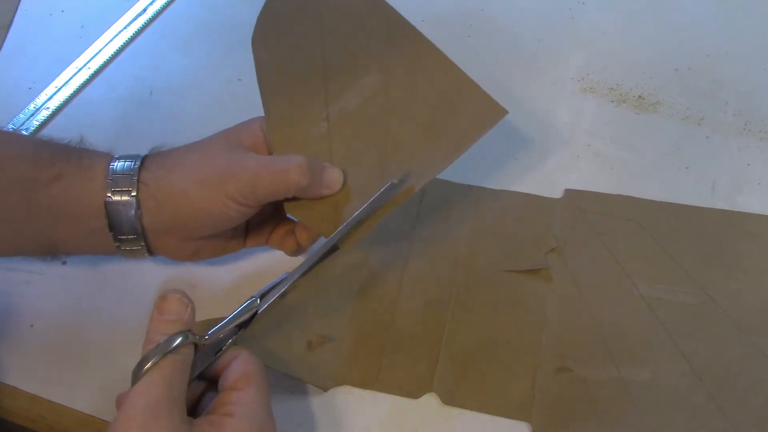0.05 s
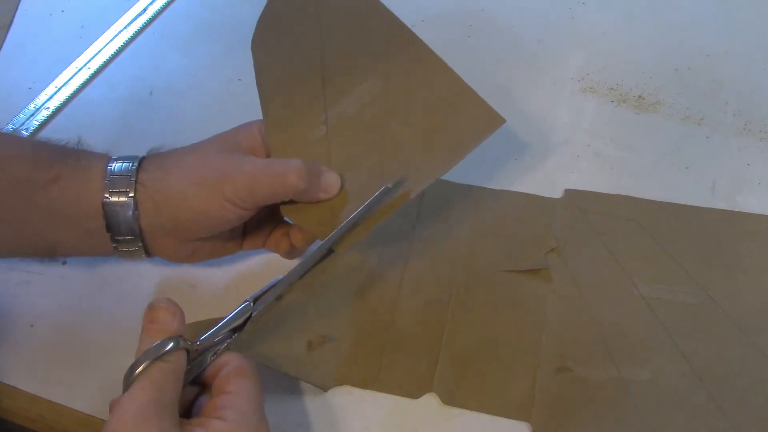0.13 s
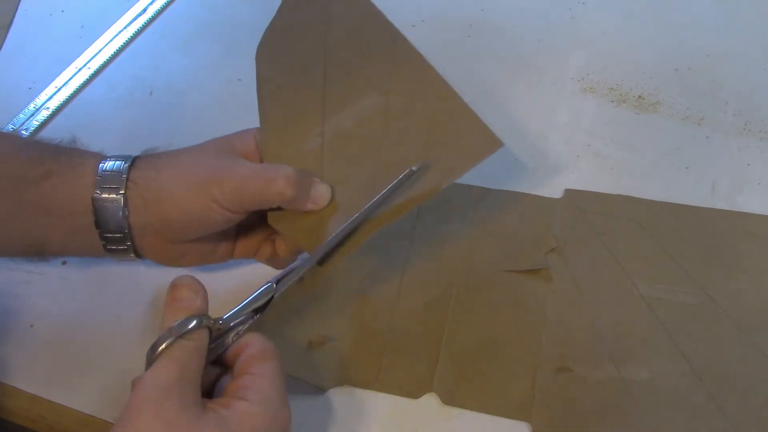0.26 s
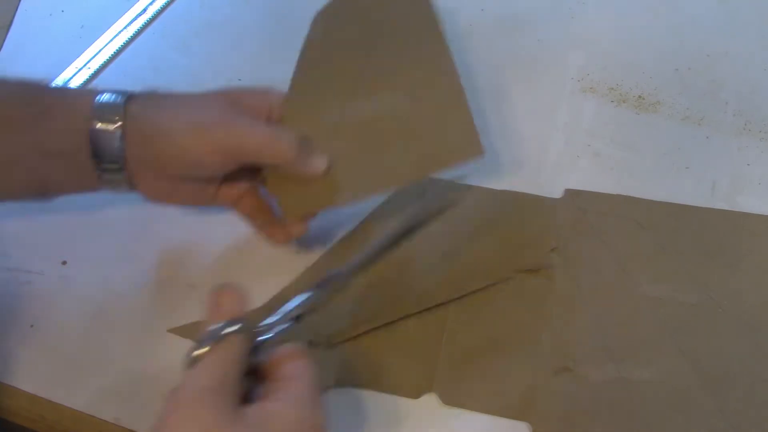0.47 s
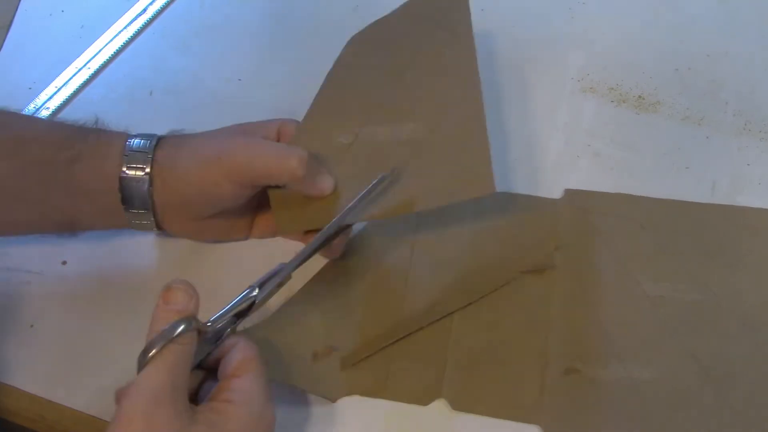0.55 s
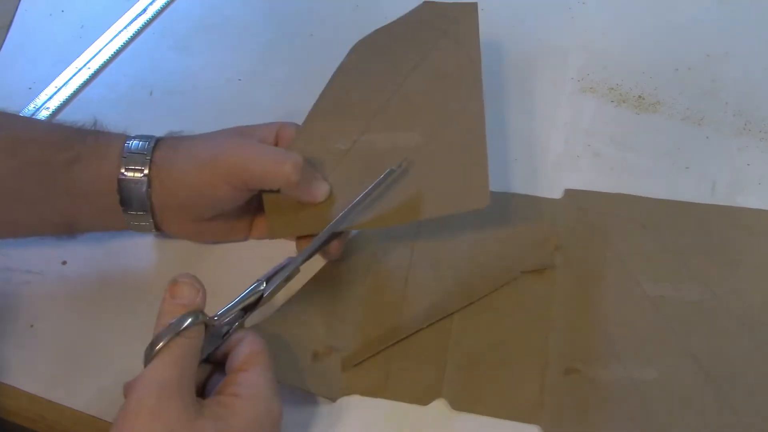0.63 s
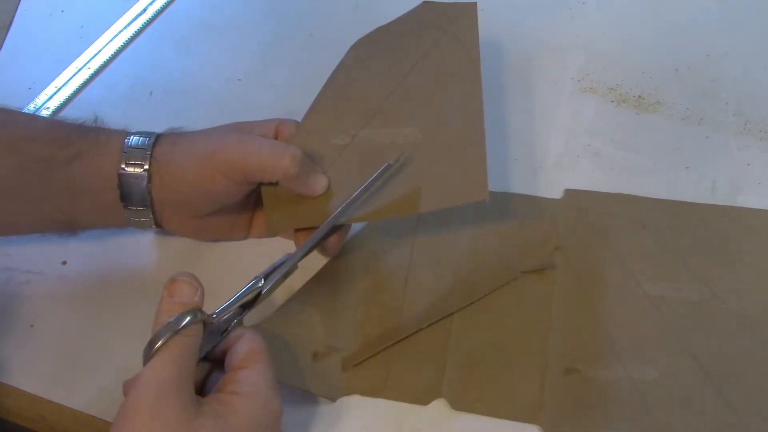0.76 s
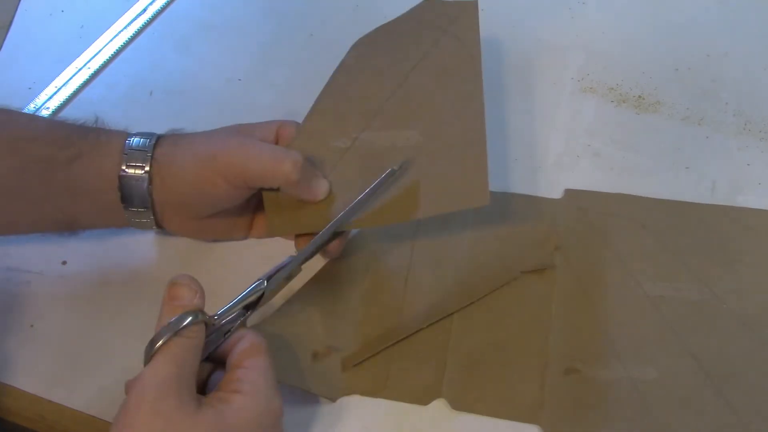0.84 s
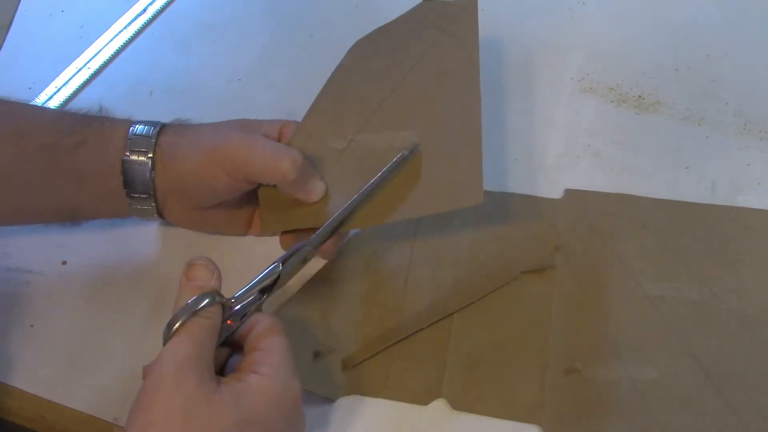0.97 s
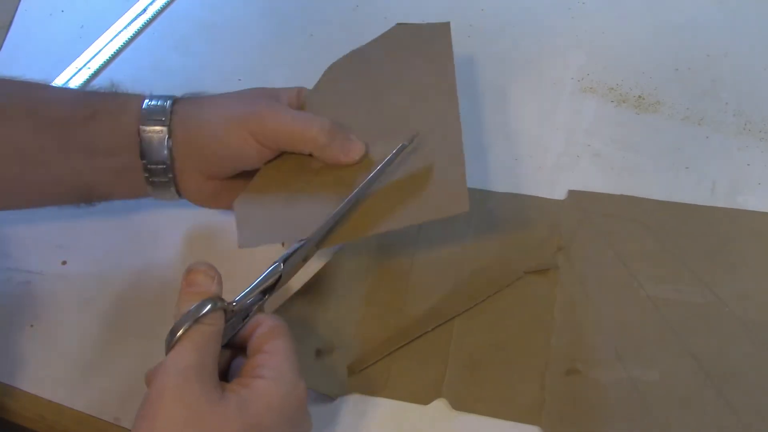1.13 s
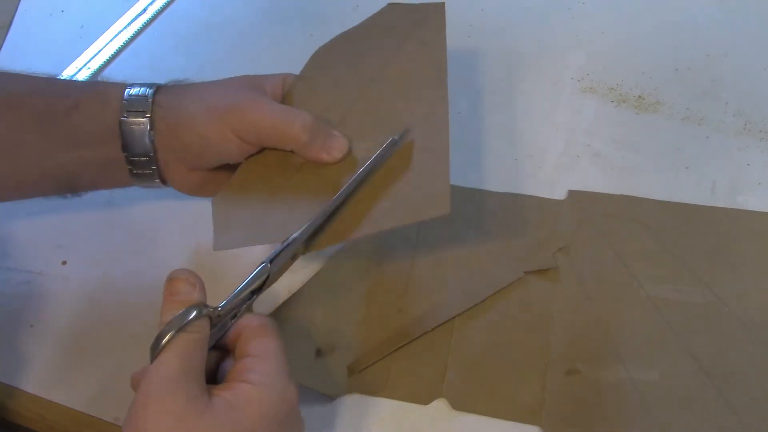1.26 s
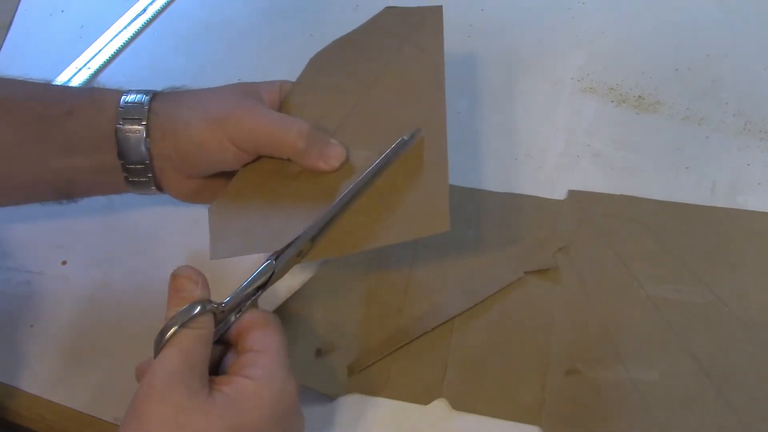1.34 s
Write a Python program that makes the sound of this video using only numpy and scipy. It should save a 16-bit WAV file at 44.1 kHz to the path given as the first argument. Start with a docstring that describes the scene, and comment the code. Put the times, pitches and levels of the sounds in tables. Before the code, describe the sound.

Scissors cut thin cardboard: crisp crunches, one loud metallic snap, a pause, then gentler snips

```python
"""Scissors through thin cardboard

Close on steel scissors cutting thin cardboard over a table in a quiet room. Crunches are bursts of breaking fibres
that crackle and shake the sheet; many make the blades ring faintly, others are without blade ring.
Some breaks add a short ping. The first cut ends in one loud snap as the blades close through the edge; after a
pause a second, gentler cut begins. Table and hands reflect at short distance, over steady rumble and hiss."""
import sys
import numpy as np
from scipy import signal
from scipy.fft import rfft, irfft
from scipy.io import wavfile
from scipy.ndimage import uniform_filter1d

SR = 44100
rng = np.random.default_rng(int(sys.argv[2]) if len(sys.argv) > 2 else 0)


def wav_out(sig):
    """Save sig, one row per channel (or a flat mono array), as 16-bit PCM at SR to the path in sys.argv[1]."""
    wavfile.write(sys.argv[1], SR, np.round(np.clip(np.atleast_2d(sig).T, -1, 1) * 32767).astype(np.int16))


N = 61739

# steady background of the room, its colour: pitch_hz, level_db
BACKGROUND_COLOUR = [(20, -4), (80, 0.5), (150, -5.5), (400, -7), (1100, -12.5), (3500, -17.5),
                     (10000, -23.5), (15500, -29.5)]
BACKGROUND_DB = -58.5

# bursts of breaking fibres: mean rate, and decibels multiplying a random size of mean 1
FIBRES_PER_S, FIBRE_SCATTER_DB = 9000, 1.57
# the edge catches and slips: decibels per standard deviation, and averaging length of the clumps
CATCH_DB, CATCH_S = 1.95, .001

# colour of tearing fibres: pitch_hz, level_db
TEAR_COLOUR = [(300, -35), (900, -8), (1800, 6), (2900, 4), (5600, 3), (6600, -5), (10000, -5),
               (16000, -28)]
# nominal hump width as a share of its centre, and share of plain tearing under it; damping scales both
CRACKLE_WIDTH, CRACKLE_BASE = 0.34, 0.47

# modes of the held sheet: pitch_ratio (of its resonance), width_ratio (of its resonance, at damping 1), level_db
SHEET_MODES = [(.45, 0.21, -8), (1.0, 0.43, 10), (1.36, 0.21, 0.5), (1.8, 1, -4), (.74, 0.41, 1.5)]
SHEET_LEAD_S = 0.001914  # head start at damping 1, so that the slowly swelling modes crest with the crackle

# crunches of breaking fibres without blade ring: middle_s, spread_s, sheet_db, crackle_hz (hump centre), crackle_db
RINGLESS_CRUNCHES = [ (.005, .0045, -60, 2800, -55.5), (.06, .011, -52, 3360, -50),
                     (.115, 0.012, -53.5, 2580, -60), (0.14, 0.006, -48.5, 3020, -46),
                     (0.205, 0.0082, -53.5, 3440, -52.5), (0.328, 0.0014, -75, 2630, -55),
                     (.359, 0.01, -83, 3000, -60), (0.474, 0.0074, -68, 2970, -61),
                     (0.673, 0.009, -65.5, 4260, -61), (0.726, 0.01, -59, 4350, -57),
                     (0.775, 0.02, -65.5, 4130, -64), (0.881, 0.01, -55, 2820, -55.5),
                     (0.944, 0.021, -61.5, 3360, -65), (1.087, 0.01, -54, 3020, -53.5),
                     (1.189, .012, -59, 3430, -53.5), (1.262, 0.012, -51.5, 2400, -56.5),
                     (1.38, 0.0092, -54, 4300, -58)]
RINGLESS_SHEET_HZ = 1220

# crunches of the blades in the board: middle_s, spread_s, sheet_hz, sheet_db, crackle_hz (hump centre),
# crackle_db, steel_db, damping (ratio: under 1 rings, over 1 is dry)
BLADE_CRUNCHES = [ (0.0157, 0.0039, 1400, -56, 3300, -47.5, -62.5, 0.41),
                  (0.0866, 0.0025, 1070, -45, 2820, -41, -54, 1.2),
                  (0.099, 0.0048, 1205, -41, 2500, -44, -62, 1.4),
                  (0.1651, 0.003, 1130, -39.5, 4700, -42, -49.5, 0.93),
                  (.182, 0.011, 1010, -51, 3800, -50.5, -62.5, 1.4),
                  (0.2093, 0.002, 930, -38.5, 2500, -49.5, -66, 2.4),
                  (0.2192, 0.0015, 1450, -29, 4530, -34, -64, 1.2),
                  (0.694, 0.0035, 1090, -57, 4770, -44.5, -79, 0.57),
                  (0.837, 0.0029, 1380, -46, 4230, -49, -60, 1.19),
                  (0.852, 0.0045, 1470, -63, 4200, -54.5, -73, 0.93),
                  (0.917, 0.0039, 594, -50.5, 2430, -53, -76, 1.46),
                  (1.015, 0.002, 650, -53.5, 4000, -52.5, -75, 1.22),
                  (1.0343, 0.0048, 950, -43, 2930, -41, -50, 1.15),
                  (1.05, 0.0027, 1120, -42, 3170, -45.5, -53, 1.11),
                  (1.135, 0.0059, 1000, -65, 2700, -53, -61, 0.5),
                  (1.143, 0.0015, 1000, -49, 2840, -47.5, -51, 1.35),
                  (1.231, 0.0019, 1105, -43, 2430, -43, -83, 1.63),
                  (1.303, 0.01, 1080, -49.5, 3300, -48.5, -82, 1.44),
                  (1.312, 0.0042, 1070, -51, 5000, -47, -89, 1.06),
                  (1.393, 0.0022, 920, -47.5, 3840, -44.5, -62, 0.78)]
# modes of the blades: pitch_hz, width_hz (when they snap shut), snap_db, scrape_db
BLADE_MODES = [(950, 180, -19, -25), (2175, 460, 0.5, -34), (2940, 93, -16, -19), (3493, 250, -14.5, -15),
               (5490, 410, -2, 5.5), (6470, 470, -13, -11), (8590, 860, -10.5, 5), (9360, 670, -11.5, 5),
               (10360, 710, -3, 5), (11180, 840, -3, 8.5), (12490, 650, -10.5, 0), (13600, 580, -11, -1),
               (14840, 410, -8, -8)]
SCRAPE_WIDTH = 0.56  # share of each blade mode's width at damping 1: open blades ring more freely

# short rings of board or blade: start_s, pitch_hz, level_db
FIBRE_PINGS = [ (0.0162, 2810, -44), (.0855, 1162, -39), (.086, 1547, -38), (.162, 1140, -33),
               (.161, 5460, -43), (0.833, 1030, -51.5), (.834, 4140, -45), (1.034, 2615, -41),
               (1.049, 2620, -42.5), (1.049, 3410, -42.5), (1.1415, 2520, -42.5), (1.1412, 11180, -49),
               (1.143, 968, -44), (1.144, 1350, -42)]
PING_WIDTH_HZ = 120  # at 1 kHz; grows with the square root of pitch

# the closing snap; its spread and the jolt's only set loudness
SNAP_S, SNAP_SPREAD_S, SNAP_DB, SNAP_CRACK_DB = .223, 0.00065, -9.5, -17
# CHATTER_SHARE is relative to the single strike
CHATTER_FADE_S, CHATTER_SHARE, CRACK_DULL_HZ, CRACK_LOW_HZ = 0.0036, 0.046, 5900, 780
# the sheet's jolt as the cut frees it: pitch_hz, width_hz, level_db
JOLT_MODES = [(272, 106, -13), (494, 200, 0.5), (1030, 187, 5), (1400, 230, 0)]
JOLT_AFTER_S, JOLT_SPREAD_S, JOLT_DB = 0.003645, 0.00093, -24
# the freed strip flicks off
FLICK_S, FLICK_SPREAD_S, FLICK_HZ, FLICK_DB = .239, 0.0026, 4100, -38.5

# early echoes from table and hands: pitch_hz, t60_s
NEAR_DECAYS = [(400, 0.11), (1400, 0.071), (4000, 0.058), (9000, 0.058), (14000, 0.065)]
NEAR_DB, NEAR_DELAY_S, NEAR_DULL_HZ = -18.5, 0.0019, 7100
# the faint room behind them
ROOM_DB, ROOM_T60_S, ROOM_DULL_HZ = -40.5, 0.28, 3800

TOP_HZ = 15700  # upper limit of the recorder


def undb(db):
    """Decibels to gain."""
    return 10 ** (np.asarray(db) / 20)


def unit(x):
    """Scale to unit energy."""
    return x / np.sqrt(np.sum(x ** 2) + 1e-30)


def burst(x, spread, db):
    """Give a burst of this spread its level at the crest."""
    return unit(x) * np.sqrt(2 * spread * SR) * undb(db)


def colour(x, points):
    """Filter by pitch and level points, joined along log frequency."""
    hz, db = np.array(points).T
    f = np.fft.rfftfreq(len(x), 1 / SR)
    gain = undb(np.interp(np.log(f + 1), np.log(hz), db))
    return irfft(rfft(x) * gain, len(x))


def cut(x, hz, kind, order=2):
    """Low-pass or high-pass."""
    sos = signal.butter(order, min(hz, .45 * SR), kind, fs=SR, output="sos")
    return signal.sosfilt(sos, x)


def ring(x, hz, width):
    """One damped resonance, gain 1 at its centre."""
    hz = min(hz, .45 * SR)
    b, a = signal.iirpeak(hz, hz / width, fs=SR)
    return signal.lfilter(b, a, x)


def mode(x, hz, width):
    """Two equal resonances in a row: swells and fades, with steep flanks and unit energy."""
    return unit(ring(ring(x, hz, width), hz, width))


def background():
    """Steady room rumble and microphone hiss, as coloured noise."""
    noise = colour(rng.standard_normal(N), BACKGROUND_COLOUR)
    return unit(noise) * np.sqrt(N) * undb(BACKGROUND_DB)


def fibres(at, spread):
    """A swell of tiny random breaks, strongest at its middle, in clumps as the edge catches and slips."""
    t = np.arange(N) / SR
    breaking = rng.random(N) < FIBRES_PER_S / SR
    size = rng.exponential(size=N)
    sign = rng.choice([-1, 1], N)
    catch = uniform_filter1d(rng.standard_normal(N), int(CATCH_S * SR) + 1)
    level_db = FIBRE_SCATTER_DB * size + CATCH_DB * catch / catch.std()
    swell = np.exp(-.5 * np.minimum(((t - at) / spread) ** 2, 100))
    return breaking * sign * undb(level_db) * swell


def sheet(breaks, sheet_hz, damping=1):
    """The breaks sound the held sheet's modes; drier breaks widen them and stir the side modes more."""
    early = np.roll(breaks, -int(SHEET_LEAD_S / np.sqrt(damping) * SR))
    out = np.zeros(N)
    for i, (ratio, width, db) in enumerate(SHEET_MODES):
        stir = 1 if i == 1 else damping  # mode 1 is the main one
        out += undb(db) * stir * mode(early, sheet_hz * ratio, sheet_hz * width * np.sqrt(damping))
    return out


def crackle(breaks, hz, damping=1):
    """The dry sound of tearing, with a broad hump."""
    hump = ring(breaks, hz, hz * CRACKLE_WIDTH * damping)
    return colour(hump + CRACKLE_BASE * damping * breaks, TEAR_COLOUR)


def ringless_crunches():
    """Fainter or duller crunches: breaking fibres crackle and shake the sheet, without blade ring."""
    out = np.zeros(N)
    for at, spread, sheet_db, crackle_hz, crackle_db in RINGLESS_CRUNCHES:
        breaks = fibres(at, spread)
        out += burst(sheet(breaks, RINGLESS_SHEET_HZ), spread, sheet_db)
        out += burst(crackle(breaks, crackle_hz), spread, crackle_db)
    return out


def blade_crunches():
    """Breaking fibres crackle, shake the sheet and scrape the blades."""
    out = np.zeros(N)
    for at, spread, sheet_hz, sheet_db, crackle_hz, crackle_db, steel_db, damping in BLADE_CRUNCHES:
        breaks = fibres(at, spread)
        steel = sum(undb(db) * mode(breaks, hz, width * SCRAPE_WIDTH * damping)
                    for hz, width, _, db in BLADE_MODES)
        out += burst(sheet(breaks, sheet_hz, damping), spread, sheet_db)
        out += burst(crackle(breaks, crackle_hz, damping), spread, crackle_db)
        out += burst(steel, spread, steel_db)
    return out


def pings():
    """A stiff bundle of fibres gives way at once and rings board or blade briefly; high pings die sooner."""
    out = np.zeros(N)
    for at, hz, db in FIBRE_PINGS:
        tap = signal.unit_impulse(N, int(at * SR)) + 1e-18  # the offset keeps the filter off vanishing numbers
        ping = mode(tap, hz, PING_WIDTH_HZ * np.sqrt(hz / 1000))
        out += ping / np.abs(ping).max() * np.sqrt(2) * undb(db)
    return out


def snap():
    """The blades clash shut and chatter, the last edge cracks, the sheet jolts and the strip flicks away."""
    age = np.arange(N) / SR - SNAP_S
    chatter = unit(rng.choice([-1, 1], N) * (age > 0) * np.exp(-np.abs(age) / CHATTER_FADE_S))
    strike = signal.unit_impulse(N, int(SNAP_S * SR)) + CHATTER_SHARE * chatter
    steel = sum(undb(db) * mode(strike, hz, width) for hz, width, db, _ in BLADE_MODES)
    crack = cut(cut(chatter, CRACK_DULL_HZ, "low", order=1), CRACK_LOW_HZ, "high")
    push = signal.unit_impulse(N, int((SNAP_S + JOLT_AFTER_S) * SR))
    jolt = sum(undb(db) * mode(push, hz, width) for hz, width, db in JOLT_MODES)
    flick = crackle(fibres(FLICK_S, FLICK_SPREAD_S), FLICK_HZ)
    out = burst(steel, SNAP_SPREAD_S, SNAP_DB) + burst(crack, SNAP_SPREAD_S, SNAP_CRACK_DB)
    out += burst(jolt, JOLT_SPREAD_S, JOLT_DB)
    return out + burst(flick, FLICK_SPREAD_S, FLICK_DB)


def room(x):
    """Quick reflections close by and a faint longer tail, each a fading noise convolved with the sound."""
    t = np.arange(SR // 3) / SR

    def fade(t60):
        """Silence up to the first reflection, then a fall of 60 dB per t60."""
        return np.exp(-np.log(1000) * t / t60) * (t > NEAR_DELAY_S)

    near = sum(ring(rng.standard_normal(len(t)), hz, hz / 2) * fade(t60) for hz, t60 in NEAR_DECAYS)
    far = rng.standard_normal(len(t)) * fade(ROOM_T60_S)
    echo = undb(NEAR_DB) * unit(cut(near, NEAR_DULL_HZ, "low", order=1))
    echo += undb(ROOM_DB) * unit(cut(far, ROOM_DULL_HZ, "low"))
    return x + signal.fftconvolve(x, echo)[:N]


def scene():
    """Both kinds of crunches, pings and the snap in the room, over its background."""
    scissors = ringless_crunches() + blade_crunches() + pings() + snap()
    return (room(scissors) + background())[None]


def record(dry):
    """The recorder cuts the top with a steep low-pass."""
    return signal.sosfilt(signal.ellip(10, .2, 80, TOP_HZ, fs=SR, output="sos"), dry)


dry = scene()
out = record(dry)
wav_out(out)
```